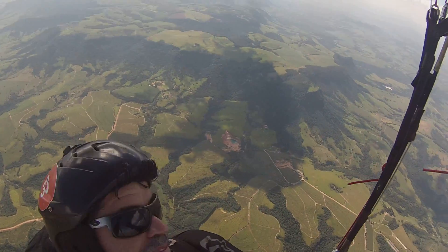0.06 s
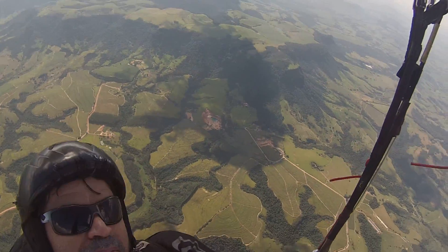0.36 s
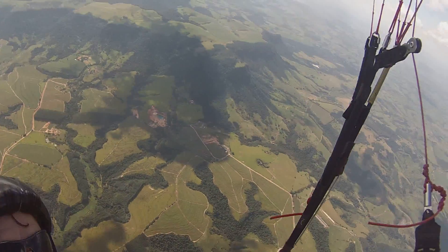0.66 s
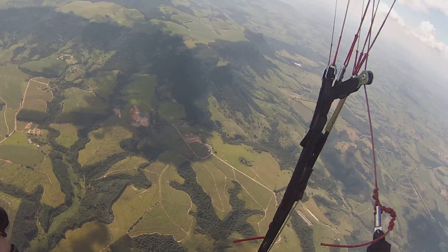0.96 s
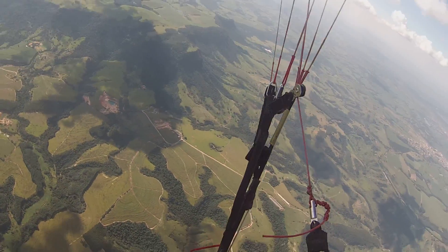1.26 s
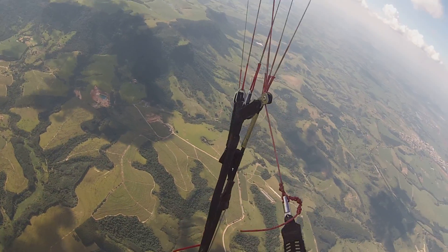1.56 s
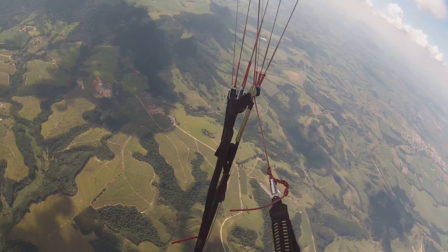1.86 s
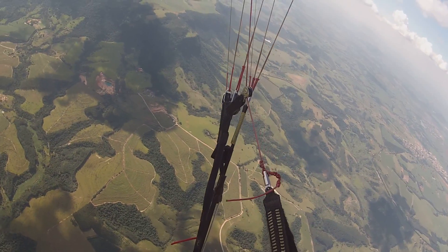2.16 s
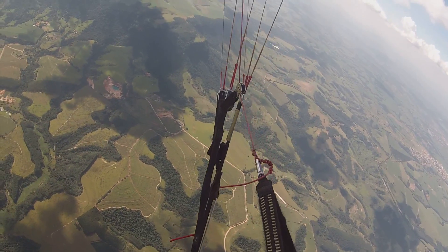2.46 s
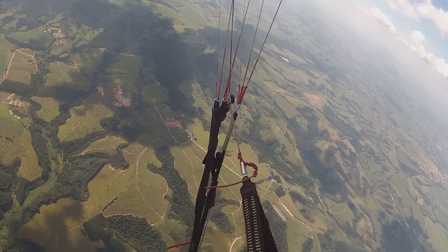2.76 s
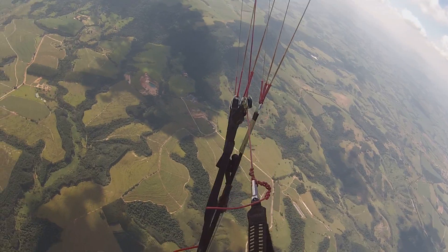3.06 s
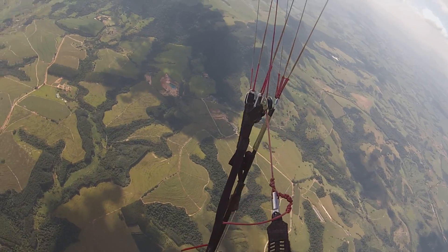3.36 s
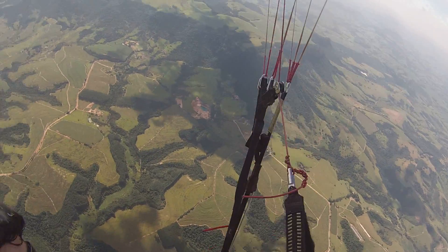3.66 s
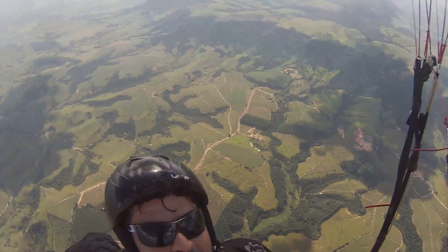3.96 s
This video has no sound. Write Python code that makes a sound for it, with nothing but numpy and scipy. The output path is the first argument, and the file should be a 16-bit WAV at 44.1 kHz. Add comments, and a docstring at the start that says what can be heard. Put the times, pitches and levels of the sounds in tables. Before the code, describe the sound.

Steady wind roars and rumbles on the microphone in paragliding flight, with faint crackles and clicks.

```python
"""Wind buffets the microphone port of a small camera held out from a paraglider, high above open land.
Eddies rumble, thump and roar at the port; the roar wavers in strength and slightly in brightness, and a
hollow resonance swells near the end. Air hisses over the case in quick spurts, the fluttering gear
crackles finely, and the slipping mount gives dry handling clicks."""
import sys
import numpy as np
from scipy import signal
from scipy.fft import rfft, irfft
from scipy.io import wavfile
from scipy.ndimage import uniform_filter1d, minimum_filter1d, map_coordinates

SR = 44100
rng = np.random.default_rng(int(sys.argv[2]) if len(sys.argv) > 2 else 0)


def unload_wav(signal):
    """Save mono or channel-first audio to the path in sys.argv[1] as 16-bit WAV at rate SR, clipped to [-1, 1]."""
    wavfile.write(
        sys.argv[1],
        SR,
        np.round(np.clip(np.atleast_2d(signal).T, -1, 1) * 32767).astype(np.int16),
    )


N = 176400
T = np.arange(N) / SR

# eddies at the port: t/s, relative rumble level/dB, relative roar level/dB
EDDY_LEVELS = [(0, -19, -20), (0.15, -17, -16), (0.22, -17, -19), (0.42, -17, -22.5), (0.55, -15, -20.5),
               (0.65, -17, -20), (0.85, -17, -19), (1.2, -15.5, -19), (1.45, -17.5, -18.5),
               (2.0, -18.5, -19.5), (2.35, -19, -17.5), (2.8, -17.5, -17.5), (3.05, -18, -17.5),
               (3.4, -18.8, -18.5), (3.72, -18.0, -16), (3.84, -17, -17), (3.93, -16.5, -19),
               (4.0, -21, -14.5)]
# air over the case: t/s, relative hiss level/dB, relative treble level/dB
AIRFLOW_LEVELS = [(0, -42.5, -57.5), (0.15, -40.5, -56), (0.2, -46, -60), (0.28, -42, -52.5),
                  (0.35, -47, -59), (0.5, -42, -55.5), (0.75, -41.5, -53), (1.17, -41, -52.5),
                  (1.28, -43, -56.5), (1.45, -39.5, -52.5), (1.9, -40.5, -52.5), (2.1, -38.5, -51.5),
                  (2.76, -37.5, -50.5), (3.6, -38, -52), (3.8, -37, -49.5), (3.9, -42.5, -57),
                  (3.96, -39.3, -47)]


def undb(db):
    """Decibels to gain."""
    return 10 ** (np.asarray(db) / 20)


def curve(table, column=1):
    """Table column, interpolated linearly in time."""
    rows = np.array(table)
    return np.interp(T, rows[:, 0], rows[:, column])


def swell(peak_s, width_s, power=2):
    """Bell envelope, 1/e at width_s from its peak."""
    return np.exp(-np.abs((T - peak_s) / width_s) ** power)


def unit_rms(x):
    """Scale to rms 1."""
    return x / np.sqrt(np.mean(x ** 2))


def colour(x, spectrum):
    """Filter by (f/Hz, level/dB) points, -40 dB/octave beyond the ends; rms 1."""
    hz, db = np.array(spectrum).T
    octave = np.log2(np.maximum(np.arange(N // 2 + 1) * SR / N, 1))
    knots = np.log2(hz)
    beyond_oct = np.abs(octave - np.clip(octave, knots[0], knots[-1]))
    gain = undb(np.interp(octave, knots, db) - 40 * beyond_oct)
    return unit_rms(irfft(rfft(x) * gain, N))


def noise(spectrum):
    """Coloured noise, rms 1."""
    return colour(rng.standard_normal(N), spectrum)


def wander(rate_hz):
    """Smooth random wander, rms 1."""
    steps = rng.standard_normal(8192)
    return unit_rms(map_coordinates(steps, [T * rate_hz], order=3, mode="mirror"))


def steady(x, span_s):
    """Hold the rms near 1 over spans longer than span_s."""
    size = max(int(span_s * SR), 2)
    power = uniform_filter1d(uniform_filter1d(x ** 2, size), size)
    return x / np.sqrt(power + 1e-12)


def gear_crackle(ticks_per_s=520, spread_db=4, decay_s=0.00038):
    """Fluttering gear ticks densely, louder while the mount is turned."""
    # tick spectrum: f/Hz, relative level/dB
    spectrum = [(1200, -5.5), (2200, 4), (3400, 2.5), (3900, -6.5), (4800, -6), (6500, -14), (8100, -17.5),
                (8800, -26.5), (10500, -33), (14000, -53)]
    onsets = rng.random(N) < ticks_per_s / SR
    ticks = onsets * undb(spread_db * np.clip(rng.standard_normal(N), -2, 2))
    envelope = signal.lfilter([1], [1, -np.exp(-1 / (SR * decay_s))], ticks)
    crackle = colour(envelope * rng.standard_normal(N), spectrum)
    turning_db = 2.5 * swell(peak_s=0.77, width_s=0.66, power=4)
    return crackle * undb(curve(AIRFLOW_LEVELS, column=2) + 5.5 + turning_db)


def mount_clicks(attack_s=0.00026, ring_decay_s=0.0007, snap_decay_s=0.00057):
    """Each slip of the mount rings the case briefly, with a thin bright snap."""
    # slips: t/s, ring level/dB, snap level/dB
    slips = [(0.4745, -28, -69), (.5668, -32, -60), (.570, -27, -52), (0.576, -36, -70), (0.607, -27, -58),
             (0.610, -33, -66), (.6608, -27, -51), (0.6735, -25, -70), (0.6923, -27, -68),
             (0.724, -26, -41), (0.7529, -23.5, -65), (0.7712, -31, -68), (0.791, -26, -45),
             (0.8459, -25, -39), (0.894, -29, -67), (1.0066, -21, -46.5), (1.133, -28, -69),
             (1.1585, -35, -64), (1.176, -20.5, -39), (1.1776, -24, -45), (3.959, -28, -54)]
    # case ring spectrum: f/Hz, relative level/dB
    ring_spectrum = [(900, -12), (1900, -0.5), (2600, 7.5), (3400, 2), (4000, -6), (5200, -9), (6800, -29),
                     (8000, -16.5), (9500, -39), (15000, -56)]
    # snap spectrum: f/Hz, relative level/dB
    snap_spectrum = [(3000, -7), (5000, 3), (7000, -2), (8000, 10), (9500, -14), (12000, -5), (13300, 0),
                     (14400, -2.5), (15500, -9)]
    ring = steady(noise(ring_spectrum), span_s=0.0003)
    snap = steady(noise(snap_spectrum), span_s=0.0006)
    out = np.zeros(N)
    for peak_s, ring_db, snap_db in slips:
        age_s = np.maximum(T - peak_s, 0)
        attack = np.sin(np.pi / 2 * np.clip(1 + (T - peak_s) / attack_s, 0, 1)) ** 2
        out += ring * undb(ring_db) * attack * np.exp(-age_s / ring_decay_s)
        out += snap * undb(snap_db) * attack * np.exp(-age_s / snap_decay_s)
    return out


def case_hiss(hiss_trim_db=1.56, treble_trim_db=-1.8):
    """Air rushes over the case; hiss and treble spurt together."""
    # hiss spectrum: f/Hz, relative level/dB
    hiss_spectrum = [(500, -14.5), (1200, 2.5), (1600, 0), (2000, 1), (2500, 0.5), (2950, -5), (3350, -2),
                     (3800, -14.5), (5000, -30)]
    # treble spectrum: f/Hz, relative level/dB
    treble_spectrum = [(2800, -15.5), (3900, -3.5), (4600, 1.5), (5600, -5), (6300, -5.5), (7000, -11.5),
                       (8100, -14.5), (8700, -20), (10500, -24), (12500, -35), (15000, -46)]
    spurts = wander(rate_hz=171.4) + 0.23 * wander(rate_hz=45)
    hiss = colour(rng.standard_normal(N) * undb(1.17 * spurts), hiss_spectrum)
    hiss *= undb(curve(AIRFLOW_LEVELS) + hiss_trim_db)
    flickering = rng.standard_normal(N) * undb(0.5 * spurts + 1.5 * wander(rate_hz=580))
    treble = colour(flickering, treble_spectrum)
    return hiss + treble * undb(curve(AIRFLOW_LEVELS, column=2) + treble_trim_db)


def gust(level_db=-33.5, rasp_db=3.5):
    """A short gust rasps in the midrange."""
    # gust spectrum: f/Hz, relative level/dB
    spectrum = [(400, 1), (900, 11), (1400, 0.5), (2200, -5.5), (3500, -36), (6000, -37)]
    rasp = noise(spectrum) * undb(level_db + rasp_db * wander(rate_hz=110))
    return rasp * swell(peak_s=0.092, width_s=0.17)


def port_resonance(level_db=-22.5, pitch_drift=0.06):
    """Flow across the port swells into a hollow resonance of wandering pitch."""
    # resonance spectrum: f/Hz, relative level/dB
    spectrum = [(400, -17), (520, -1.5), (620, 0), (760, -4.5), (1000, -15.5)]
    position = np.cumsum(1 + pitch_drift * wander(rate_hz=7))
    band = steady(noise(spectrum), span_s=0.08)
    tone = map_coordinates(band, [position], order=3, mode="mirror")
    return tone * undb(level_db) * swell(peak_s=3.18, width_s=0.55)


def eddy_thumps(band_ratio=1.22):
    """Single large eddies hit the port, each at its own pitch."""
    # eddy hits: t/s, half-width/s, centre f/Hz, level/dB
    hits = [(0.148, 0.015, 460, -18), (0.375, 0.045, 101, -18), (0.52, .04, 34, -17.5),
            (3.863, 0.041, 153, -12), (3.98, .018, 239, -10.5)]
    out = np.zeros(N)
    for peak_s, width_s, hz, db in hits:
        band = steady(noise([(hz / band_ratio, 0), (hz * band_ratio, 0)]), span_s=0.026)
        out += band * undb(db) * swell(peak_s, width_s)
    return out


def eddy_buffet(trim_db=2):
    """The largest eddies push slowly on the microphone."""
    # deep bass spectrum: f/Hz, relative level/dB
    spectrum = [(8, -27), (20, -4.5), (35, 0.5), (55, 2), (80, -8.5), (140, -22.5)]
    # buffeting strength: t/s, relative level/dB
    levels = [(0, -32.5), (0.3, -26.5), (0.52, -27), (0.65, -29), (0.88, -34), (1.0, -28), (1.5, -29.5),
              (2.7, -29.5), (3.6, -34), (3.85, -26.5), (4.0, -40)]
    return steady(noise(spectrum), span_s=0.12) * undb(curve(levels) + trim_db)


def eddy_rumble(trim_db=0.67):
    """Mid-sized eddies rumble at the port."""
    # rumble spectrum: f/Hz, relative level/dB
    spectrum = [(40, -23.5), (70, -1.5), (110, -1.5), (180, -1), (260, -3.5), (380, -14), (700, -42.5)]
    return steady(noise(spectrum), span_s=0.15) * undb(curve(EDDY_LEVELS) + trim_db)


def eddy_roar(trim_db=1.49, lowpass_order=4.54, flutter_db=1.1):
    """Small eddies roar below an upper edge that drifts slightly around 650 Hz."""
    # roar spectrum before the low-pass: f/Hz, relative level/dB
    spectrum = [(120, -6), (230, -5.5), (340, 0.5), (480, 0.5), (620, 0.5), (800, -0.5), (1200, -.5),
                (3000, -8.5)]
    # upper edge of the roar: t/s, f/Hz
    cutoff = [(0, 605), (.16, 565), (.3, 628), (.6, 674), (1.2, 624), (2, 703), (2.7, 652), (3.3, 636),
              (3.75, 650), (3.95, 610)]
    bins, cutoff_hz = rfft(noise(spectrum)), curve(cutoff)
    bin_hz = np.maximum(np.arange(N // 2 + 1) * SR / N, 1)
    third_octaves = 3 * np.log2(bin_hz / 100)
    out = np.zeros(N)
    for k in range(18):
        centre_hz = 100 * 2 ** (k / 3)
        band = irfft(bins * np.maximum(1 - np.abs(third_octaves - k), 0), N)
        out += band / np.sqrt(1 + (centre_hz / cutoff_hz) ** (2 * lowpass_order))
    flutter = undb(flutter_db * wander(rate_hz=110))
    return steady(out * flutter, span_s=0.11) * undb(curve(EDDY_LEVELS, column=2) + trim_db)


def scene():
    """Wind and handling at one microphone."""
    wind = eddy_buffet() + eddy_rumble() + eddy_roar() + case_hiss() + gust() + eddy_thumps()
    return (wind + gear_crackle() + mount_clicks() + port_resonance())[None]


def record(dry, ceiling=0.86, cutoff_hz=15600):
    """The camera's limiter eases down the peaks; a low-pass cuts the top."""
    gain = np.minimum(ceiling / (np.abs(dry) + 1e-9), 1)
    held = minimum_filter1d(gain, size=600)
    smoothed = uniform_filter1d(uniform_filter1d(held, size=300), size=300)
    lowpass = signal.ellip(8, 0.2, 70, cutoff_hz, fs=SR, output="sos")
    return signal.sosfilt(lowpass, dry * smoothed)


dry = scene()
out = record(dry)
unload_wav(out)
```